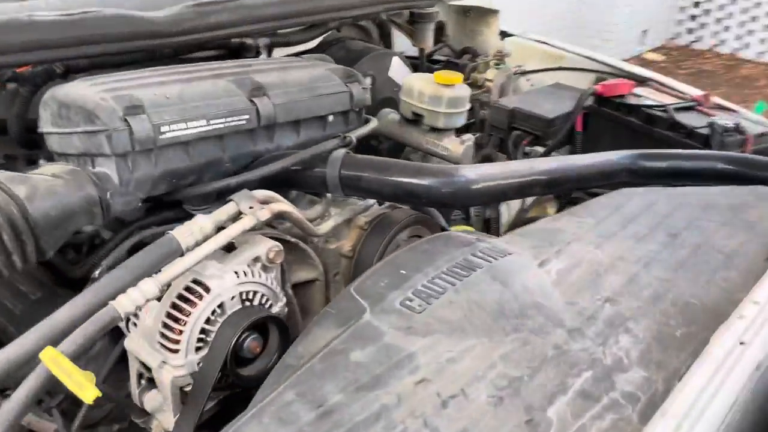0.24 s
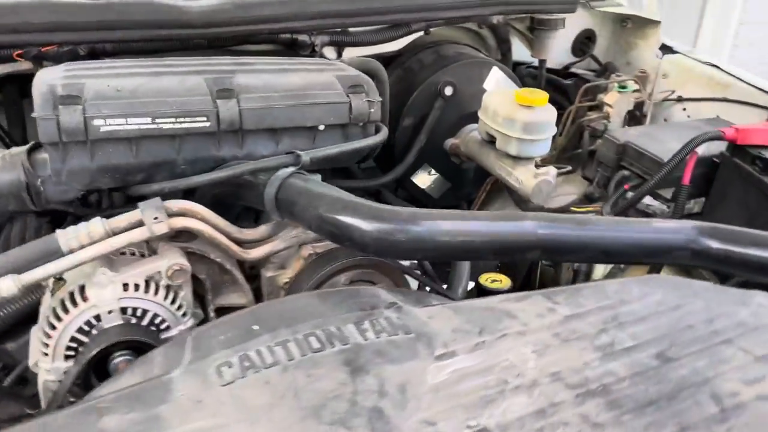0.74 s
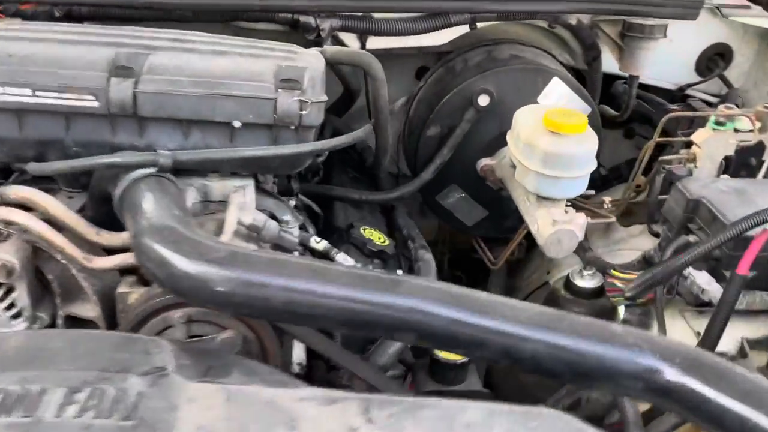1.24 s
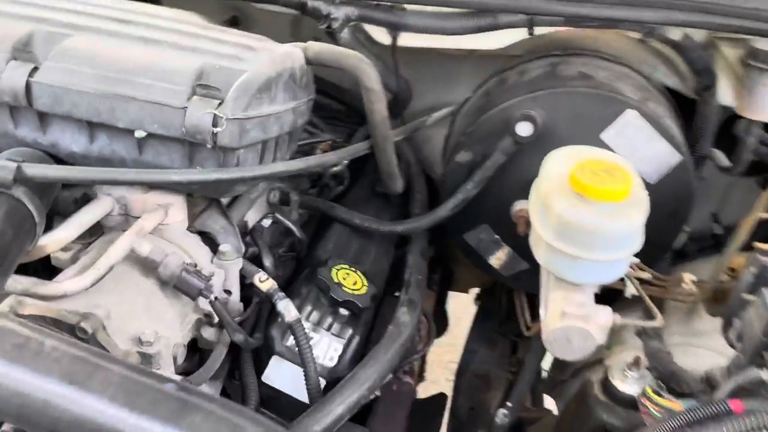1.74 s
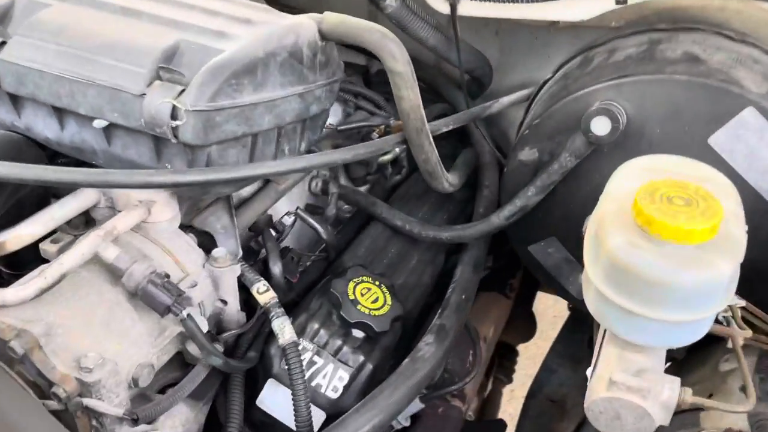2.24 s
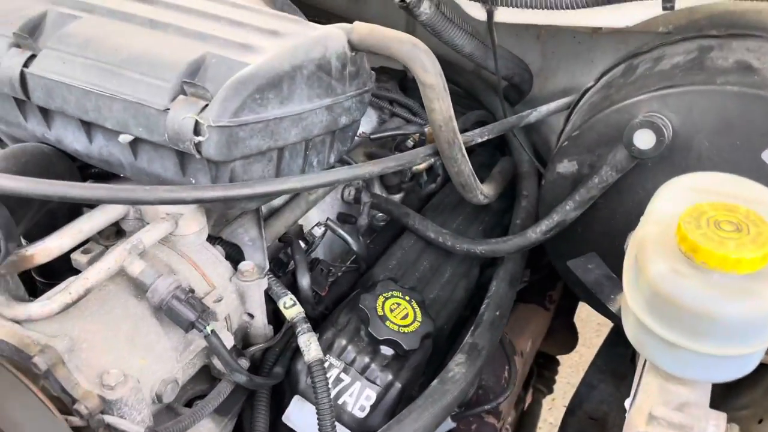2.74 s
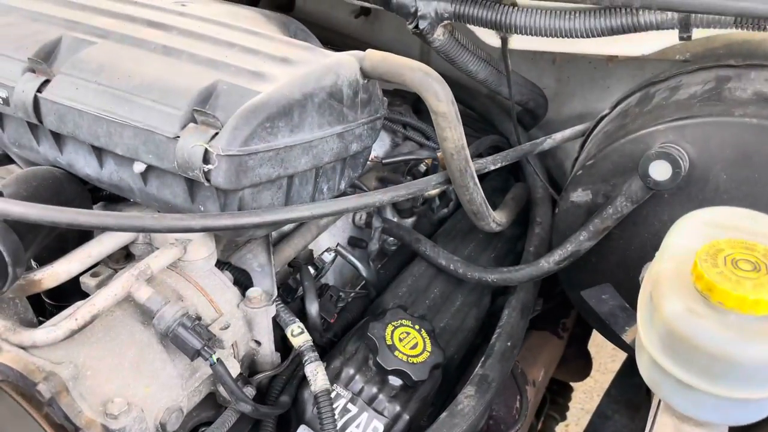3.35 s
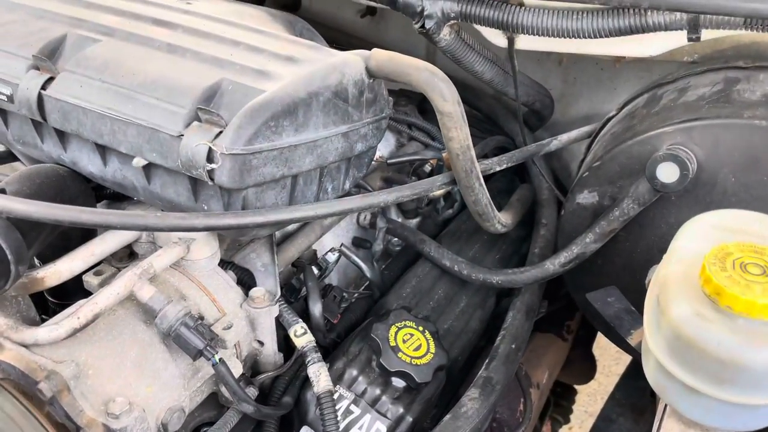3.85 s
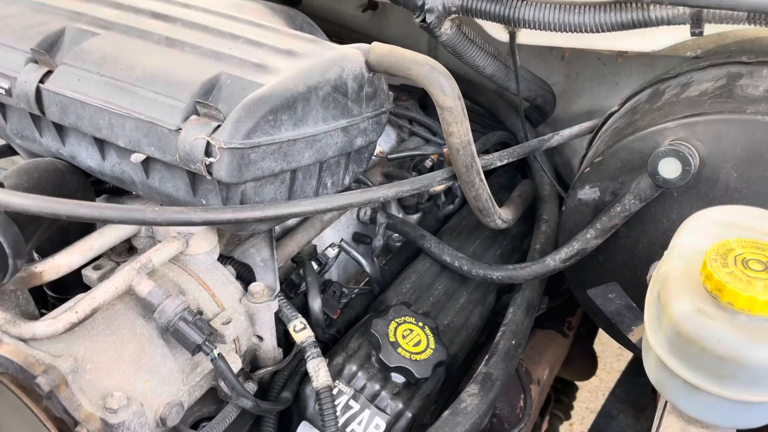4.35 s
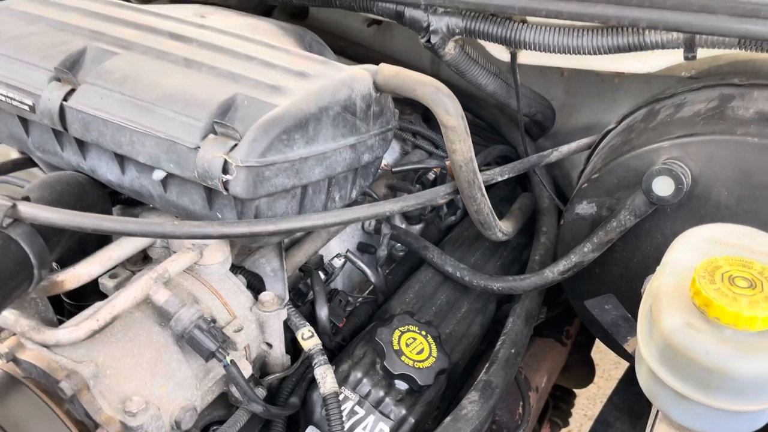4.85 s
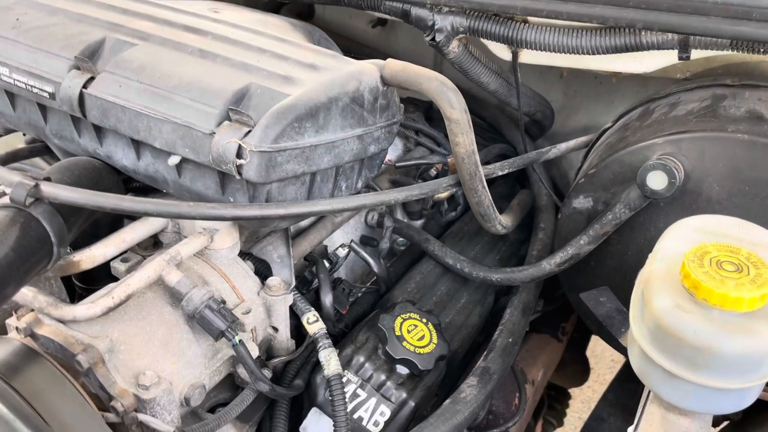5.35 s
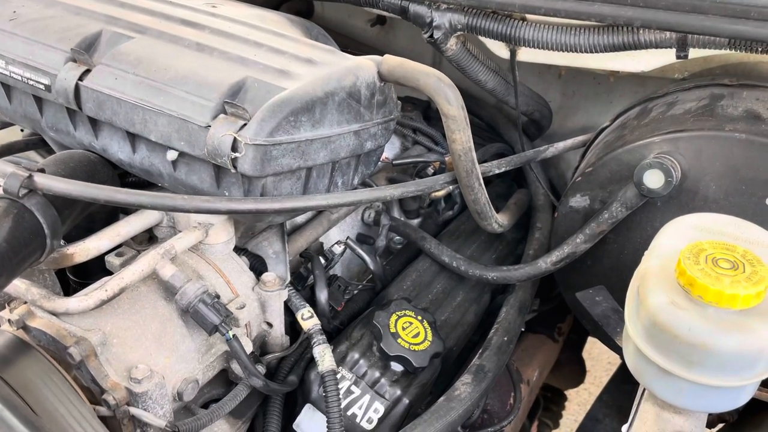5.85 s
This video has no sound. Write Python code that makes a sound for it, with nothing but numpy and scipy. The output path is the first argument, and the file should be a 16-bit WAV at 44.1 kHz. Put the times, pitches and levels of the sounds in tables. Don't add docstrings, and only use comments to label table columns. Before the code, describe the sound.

A big petrol engine drops from fast idle to a lumpy, missing idle while the listener moves from rushing fan to ticking valve gear.

```python
import sys
import numpy as np
from scipy import signal
from scipy.fft import rfft, irfft
from scipy.io import wavfile
from scipy.ndimage import uniform_filter1d

SR = 44100
rng = np.random.default_rng(int(sys.argv[2]) if len(sys.argv) > 2 else 0)


def voltage_ratio(level):
    return 10 ** (np.asarray(level, float) / 20)


def to_wav(sig):
    pcm = np.clip(np.atleast_2d(sig), -1, 1) * 32767
    pcm = np.round(pcm).astype(np.int16)
    wavfile.write(sys.argv[1], SR, pcm.T)


N = 268569
TIME = np.arange(N) / SR
COARSE = TIME[::32]
FREQ = np.fft.rfftfreq(N, 1 / SR)

# time [s], way from the fan to the bank [0-1], closeness to the metal [dB].
PHONE = [
    (0, 0, 5.5),
    (.4, 0.2, 1),
    (.7, 0.15, -1),
    (1.2, 0.43, -2),
    (1.7, 0.64, -1),
    (2.4, 0.92, -1),
    (3.1, 0.89, 0.5),
    (4.2, 0.97, 0),
    (5.0, 0.94, 2),
    (6.09, 0.94, 3),
]


def unit(x):
    return x / np.sqrt(np.mean(x ** 2))


def steady(x, span_s):
    return x / np.sqrt(uniform_filter1d(x ** 2, size=int(SR * span_s)) + 1e-9)


def curves(table):
    s, *columns = np.transpose(table)
    return [np.interp(TIME, s, c) for c in columns]


def across(table, column):
    log_hz = np.log([row[0] for row in table])
    return np.interp(np.log(FREQ + 1), log_hz, [row[column] for row in table])


def bell(s, half_s):
    return np.exp(-((COARSE - s) / half_s) ** 2)


def every_sample(coarse):
    return np.interp(TIME, COARSE, coarse)


def swells(floor_db, table):
    power = sum(voltage_ratio(db) ** 2 * bell(s, half_s) for s, half_s, db in table)
    return 10 * np.log10(voltage_ratio(floor_db) ** 2 + every_sample(power))


def walk(rate_hz):
    hold = int(SR / rate_hz)
    steps = np.repeat(rng.standard_normal(N // hold + 1), hold)
    return unit(uniform_filter1d(uniform_filter1d(steps, hold), hold)[:N])


def ring(x, modes):
    out = 0
    for hz, width_hz, db in modes:
        section = np.concatenate(signal.iirpeak(hz, hz / (1.13 * width_hz), SR))
        out = out + voltage_ratio(db) * unit(signal.sosfilt([section, section], x))
    return unit(out)


def air_noise(table, flicker_db):
    spectrum = rfft(rng.standard_normal(N)) * voltage_ratio(across(table, column=1))
    octave = np.log2(FREQ + 1)
    out = 0
    for k in range(6, 15):
        octave_slice = np.clip(1 - abs(octave - k), 0, 1)
        out = out + irfft(spectrum * octave_slice, N) * voltage_ratio(flicker_db * walk(9))
    return unit(out)


def firings(crank, column, scatter_db):
    # exhaust [dB], intake [dB], valve tick [dB].
    cylinders = [(0, -8, 0), (0, -4, 0), (-24, -6, -9), (0, 0, -2), (-24, -4, -12), (-24, -18, -6),
                 (0, -1, 0), (-24, -20, -6)]
    count = np.floor(crank).astype(int)
    habit_db = np.array(cylinders)[count % len(cylinders), column]
    return voltage_ratio(habit_db + scatter_db * rng.standard_normal(count[-1] + 2)[count + 1])


def pulses(crank, column, scatter_db):
    fired = np.diff(np.floor(crank), prepend=np.floor(crank[0]))
    return fired * firings(crank, column, scatter_db)


def clatter(crank, blows, scatter_db):
    place, db = np.transpose(blows)
    place = place + 8 * np.arange(crank[-1] // 8 + 1)[:, None]
    out = np.zeros(N + 1)
    out[np.searchsorted(crank, place)] = voltage_ratio(db + scatter_db * rng.standard_normal(place.shape))
    return out[:N]


def misses(column):
    # time [s], exhaust depth [dB], air box depth [dB]; negative = stronger.
    failed = [(0.049, 15, 11), (.11, 10, 8), (.17, 0, -1), (.235, 19, 5), (.40, 4, 0), (.46, 5, 13),
              (.56, 1, 17), (.61, 7, 23), (.71, -15, 2), (.755, 19, 19), (.89, 20, 2), (.935, 12, 24),
              (1.08, 8, 5), (1.2, 13, -4), (1.63, 6, 29), (1.71, 1, 24), (1.93, 7, -3), (2.02, -2, 5),
              (2.09, -1, -5), (2.18, 3, 6), (2.27, -3, 9), (2.35, 15, 14), (2.43, -5, 8), (2.56, -1, 12.5),
              (2.67, 1, -1), (2.77, -1, 8), (2.86, 10, 21), (3.05, -4, 8), (3.2, 10, 11), (3.29, -4, 19),
              (3.36, -4, 6), (3.56, 8, 16), (3.83, -1, 17), (4.09, 9, 3), (4.17, 2, 17), (4.28, 8, -0.5),
              (4.45, 5, -2), (4.49, 2, 6), (4.645, 19, 2), (4.91, 12, 5), (4.98, 1, 11), (5.24, 1, 9),
              (5.345, 2, 2), (5.39, -5, -1), (5.44, -2, 8), (5.51, 13, 14), (5.68, -11, 10), (5.92, -2, 2),
              (6.07, -8, -1)]
    return every_sample(voltage_ratio(-sum(row[column] * bell(row[0], half_s=.014) for row in failed)))


def boom(crank, speed, exhaust_db, box_db):
    # frequency [Hz], width [Hz], level [dB].
    exhaust_modes = [(44.5, 9.8, -4), (53.7, 12, -3), (62.3, 18.5, 6.5), (74.3, 13.7, 4), (91, 3.3, -5)]
    box_modes = [
        (103, 8, 0),
        (114, 9, -10),
    ]
    # time [s], half length [s], peak [dB].
    box_booms = [
        (0, 0.044, -26),
        (0.504, 0.016, -27),
        (0.825, 0.12, -30),
    ]
    # time [s], half length [s], level [dB].
    dip_s, dip_half_s, dip_db = (.85, .2, -4)
    rumble = (speed / speed[-1]) ** 2.56 * rng.standard_normal(N)
    pipes = ring(unit(pulses(crank, column=0, scatter_db=2.0)) + 0.07 * rumble, exhaust_modes)
    box = ring(unit(pulses(crank - .73, column=1, scatter_db=4.0)) + 0.3 * rumble, box_modes)
    exhaust_db = exhaust_db + dip_db * every_sample(bell(dip_s, dip_half_s))
    pipes = voltage_ratio(exhaust_db) * misses(column=1) * steady(pipes, span_s=.12)
    return pipes + voltage_ratio(swells(box_db, box_booms)) * misses(column=2) * steady(box, span_s=.045)


def drone(crank):
    # time [s], pitch [Hz].
    own_pitch = [(0.2, 110), (0.4, 114), (2.6, 102.6), (3.0, 104.2), (3.6, 104.8), (4.1, 103.3), (4.5, 102),
                 (5.2, 100.6)]
    # time [s], half length [s], peak [dB].
    own_swells = [
        (0.3, 0.074, -26.5),
        (2.9, 0.14, -23.5),
        (3.25, 0.083, -30),
        (3.625, 0.18, -21.5),
        (4.014, 0.17, -20.5),
        (4.33, 0.12, -25.5),
        (4.702, 0.2, -20),
        (5.0, 0.144, -28.5),
    ]
    second_swells = [
        (1.1, .16, -29),
        (1.39, .17, -23),
        (1.62, .15, -30),
        (2.6, .7, -34),
    ]
    silent_db = -70
    own = np.sin(2 * np.pi * np.cumsum(curves(own_pitch)[0]) / SR)
    second = np.cos(4 * np.pi * (crank - .04))
    notes = voltage_ratio(swells(silent_db, own_swells)) * own + voltage_ratio(swells(silent_db, second_swells)) * second
    return np.sqrt(2) * misses(column=2) * notes


def runners(crank, near, level_db):
    # pitch [Hz], drift [Hz], level [dB].
    pipe_notes = [
        (260.4, 4, 1),
        (312, 8.02, -4),
        (421.8, 14, -8),
        (562.3, 6.98, -9),
    ]
    # place in cycle [firings], level [dB].
    pipe_puffs = [
        [(.7, -4), (1.2, -6), (1.8, 0), (2.4, -6), (2.85, -3.5), (3.5, -18), (4.8, -12), (5.7, -4), (6.3, -8),
         (6.7, -5), (7.35, -14)],
        [(.3, -7), (1.5, -14), (2.6, -4.5), (3.25, 0), (4.3, -14), (6.3, -9), (7.2, -14)],
        [(.25, -2), (.85, -7), (1.5, 0), (2.25, -13), (3.2, .5), (3.8, -13), (4.75, -4), (5.75, -9), (6.25, -1),
         (7.25, -9)],
        [(.3, -6), (1.6, -.7), (2.55, -11), (3.5, 0), (4.7, -11), (6, 0), (6.8, -3)],
    ]
    out = 0
    for (hz, drift_hz, db), puffs in zip(pipe_notes, pipe_puffs):
        note = np.sin(2 * np.pi * np.cumsum(hz + drift_hz * walk(30)) / SR)
        place, puff_db = np.transpose(puffs)
        out = out + note * voltage_ratio(db + np.interp(crank, place, puff_db, period=8) + .9 * walk(25))
    return voltage_ratio(level_db + 2.0) * near * out


def cycle_knocks(crank):
    # place in cycle [firings], level [dB].
    knock_places = [
        (.24, -9.5),
        (.31, -7),
        (.97, -3),
        (2.74, -1),
        (2.81, -5.5),
        (3.02, -8.5),
        (4.8, -3),
        (5.44, -7.5),
        (7.73, -4.5),
    ]
    return unit(clatter(crank, knock_places, scatter_db=1.5))


def block(crank, knocks, near, level_db):
    # frequency [Hz], width [Hz], level [dB].
    casting_modes = [(175, 38, -4.5), (291, 54, -7), (440, 66, -2), (559.3, 42, -6), (708.5, 26, -7),
                     (922, 33, -11.5)]
    shroud_modes = [(242, 19, -6), (334.3, 27.4, 6), (620, 200, 2), (915, 210, -17), (1410, 530, 1),
                    (3465, 80, -13)]
    hush = voltage_ratio(-4 * near * np.exp(-((crank % 8 - 4.2) / .7) ** 2))
    castings = hush * steady(ring(knocks + .2 * rng.standard_normal(N), casting_modes), span_s=.3)
    shroud = steady(ring(rng.standard_normal(N), shroud_modes), span_s=.1)
    return voltage_ratio(level_db - 4.5) * (np.sqrt(0.072 + 0.12 * near) * castings + np.sqrt(1 - near) * shroud)


def valve_ticks(crank, near):
    phase = crank % 1
    burst = np.exp(-((phase - .25) / np.where(phase < .25, .08, .17)) ** 2)
    return firings(crank, column=2, scatter_db=3.0) * burst * (0.4 + 0.56 * near)


def valve_gear(ticks, near, level_db):
    # frequency [Hz], density [dB per Hz].
    hiss_colour = [(3000, -10), (5500, -6), (7200, -1), (9800, 0), (11500, -1.5), (12700, -6), (14000, 0),
                   (16000, -9.5)]
    # frequency [Hz], width [Hz], level [dB].
    injector_modes = [
        (10370, 1700, 1),
        (11880, 320, -3),
        (12640, 570, -0.5),
    ]
    hiss = air_noise(hiss_colour, flicker_db=2.25)
    injectors = ring(rng.standard_normal(N), injector_modes)
    hiss = hiss + 0.82 * near ** 2 * voltage_ratio(walk(3.06)) * injectors
    high = signal.butter(2, 6500, "high", fs=SR, output="sos")
    return voltage_ratio(level_db + 6.0) * unit(hiss + 0.92 * signal.sosfilt(high, ticks * hiss))


def tappet_rattle(crank, near):
    # place in cycle [firings], level [dB].
    cycle_blows = [(.4, -4), (1.2, 3), (1.65, 3), (2.55, 0.5), (2.9, 0), (3.7, 8), (4.4, -4), (4.7, -0.5),
                   (5.25, -9), (5.7, 5), (6.15, -2), (6.55, -10), (6.9, -5), (7.6, -12)]
    # time [s], peak [dB].
    loud_blows = [(1.6041, -31), (1.654, -37), (1.7138, -31), (1.7727, -25.5), (2.081, -30), (2.143, -28),
                  (2.2087, -32), (2.296, -37), (2.4896, -30), (2.661, -24), (2.8288, -26), (2.9565, -34),
                  (3.0039, -32), (3.0323, -33), (3.1995, -33), (3.3107, -24), (3.3411, -34), (3.4045, -35),
                  (3.5656, -29), (3.5926, -29), (3.643, -31), (3.7552, -36), (3.9243, -23), (4.0041, -33),
                  (4.085, -27), (4.3454, -42), (4.4935, -29), (4.6058, -32), (4.6547, -30), (4.739, -34),
                  (4.9235, -28), (5.0253, -31), (5.0458, -33), (5.067, -31), (5.1056, -32), (5.1575, -35),
                  (5.2009, -35), (5.241, -35), (5.6933, -26), (5.7153, -37), (5.8006, -28), (5.8839, -35),
                  (5.916, -34), (5.9392, -41), (5.983, -31)]
    blows = 0.51 * near * clatter(crank, cycle_blows, scatter_db=0.0)
    s, peak_db = np.transpose(loud_blows)
    blows[(s * SR).astype(int)] += voltage_ratio(peak_db + 29)
    chance = rng.random((2, N))
    blows += .5 * (.3 + 0.65 * near) * (chance[0] < 170 / SR) * (.3 + 1.3 * chance[1] ** 2)
    return near * .08 + signal.lfilter([1], [1, -np.exp(-1 / (.004 * SR))], blows)


def fan(rattle, level_db):
    # frequency [Hz], density [dB per Hz].
    rush_colour = [(76, -2.5), (130, -8), (167, -15.5), (266, -9.5), (360, -13.5), (564, -15), (774, -18.5),
                   (1060, -15.5), (1280, -22.5), (1720, -23), (7000, -37), (9100, -53), (15400, -120)]
    # frequency [Hz], width [Hz], level [dB].
    tappet_modes = [(1760, 154, 3.5), (2088, 360, 4), (2450, 520, -4), (3240, 950, -2), (4340, 260, -6.5),
                    (5730, 1800, -3)]
    tappets = ring(rattle * rng.standard_normal(N), tappet_modes)
    rush = air_noise(rush_colour, flicker_db=0.78)
    return voltage_ratio(level_db + 6.0) * rush + voltage_ratio(level_db - 9.0) * tappets


def alternator(crank, level_db):
    # time [s], half length [s], peak [dB].
    glimpses = [(.67, 0.066, -42.5), (1.0, 0.1, -46), (1.367, 0.087, -41.5), (1.986, 0.16, -43),
                (2.604, 0.17, -48), (3.296, 0.051, -42), (3.62, .1, -45), (4.03, 0.039, -37),
                (4.395, 0.042, -36.5), (4.7, 0.064, -39), (4.897, 0.058, -48), (5.218, 0.042, -37),
                (5.634, 0.07, -42), (6.003, 0.06, -40)]
    # time [s], half length [s], pitch
    # shift [Hz].
    sags = [
        (3.27, .05, 12),
        (4.66, .05, 8),
        (4.78, .04, -34),
        (4.94, .07, 14),
        (5.55, .04, -14),
    ]
    sag_hz = every_sample(sum(hz * bell(s, half_s) for s, half_s, hz in sags))
    turns = 185 / 8 * crank + np.cumsum(sag_hz) / SR
    level_db = swells(level_db, glimpses) + 2.1 * walk(24)
    return voltage_ratio(level_db) * np.sqrt(2) * np.sin(2 * np.pi * turns + walk(33))


def panels():
    # frequency [Hz], width [Hz], time [s], half length [s], peak [dB].
    panel_modes = [(2035, 34, 0.65, 0.081, -48), (4310, 96, 1.75, 0.44, -55), (5430, 300, 1.85, .3, -52),
                   (707, 37, 3.03, 0.24, -40), (189, 38, 3.82, 0.52, -40.5), (6200, 2000, 2.6, 0.52, -45.5),
                   (932, 35, 5.6, 0.39, -42), (270, 39, 1.54, 0.27, -34.5), (193, 45, 0.99, 0.14, -40.5),
                   (339, 16, 0.23, 0.081, -41), (608, 44, 0.14, 0.18, -39), (1450, 38, 0.19, 0.12, -51.5),
                   (3250, 400, 0.13, .06, -43), (1800, 700, 0.091, 0.2, -44), (571, 20, 2.32, 0.18, -38.5),
                   (571, 24, 5.98, 0.14, -37.5)]
    noise = rng.standard_normal(N)
    out = 0
    for hz, width_hz, s, half_s, db in panel_modes:
        out = out + every_sample(voltage_ratio(db) * bell(s, half_s)) * ring(noise, [(hz, width_hz, 0)])
    return out


def finger():
    # time [s], peak [dB].
    taps = [
        (0.885, -17.5),
        (.902, -40),
    ]
    out = np.zeros(N)
    for s, db in taps:
        age = np.clip(TIME - s, 0, 1) / 0.0036
        out += voltage_ratio(db) * age * np.exp(1 - age)
    return out * ring(rng.standard_normal(N), [(760, 200, 1), (1030, 360, 3), (1440, 270, -6)])


def ports(tones, shared, diffuse):
    # frequency [Hz], likeness [0-1], phase by which left leads [rad], left minus right [dB].
    port_table = [(100, 0.82, 0.19, -3.5), (254, 0.84, 0.41, -2.5), (440, 0.98, 0.38, -1.5),
                  (648, 0.65, 1.58, 0), (1330, 0.19, 0.6, 2), (3960, 1, 1.4, 1.8), (5200, 0.68, 0.5, 3.5),
                  (5380, 0.5, -1.8, 0), (6970, 0.9, -1, 1.5), (6560, 0.28, -2, 3), (8570, 0.85, -2.5, -0.5),
                  (13500, 0.53, -6.5, 0)]
    like = np.clip(across(port_table, column=1), 0, 1)
    lag = np.exp(-1j * across(port_table, column=2))
    balance = voltage_ratio(across(port_table, column=3) / 2)
    right = (tones + like * shared + np.sqrt(1 - like ** 2) * diffuse) * lag
    return np.array([irfft((tones + shared) * balance, N), irfft(right / balance, N)])


def scene():
    # time [s], firing rate [firings/s].
    firing_rate = [(0.25, 78.23), (0.6, 71.0), (0.72, 66.0), (1.0, 59.7), (1.25, 55.86), (1.5, 52.71),
                   (2.0, 48.12), (2.25, 46.34), (2.75, 46.67), (3.0, 46.22), (3.5, 44.64), (3.75, 44.46),
                   (4.0, 44.73), (4.25, 44.63), (4.75, 45.35), (5.0, 45.46), (5.5, 44.9), (6.09, 44.66)]
    # level at the fan [dB], gain at the bank [dB], share of the closeness [ratio].
    heard = dict(exhaust=(-30, 2.3, 0.29), box=(-32, 2.5, 0.16), block=(-31.5, 3.8, 0.73),
             fan=(-37, 0.33, 1), hiss=(-48, 4.48, 0.99), whine=(-61.5, 16.6, 1.6))
    speed = curves(firing_rate)[0]
    crank = np.cumsum(speed) / SR + 0.064
    near, close_db = curves(PHONE)
    near = np.clip(near, 0, 1)
    db = {}
    for name, (fan_db, bank_db, share) in heard.items():
        db[name] = fan_db + bank_db * near + share * close_db

    tones = boom(crank, speed, db["exhaust"], db["box"]) + drone(crank)
    tones = tones + runners(crank, near, db["block"]) + alternator(crank, db["whine"]) + panels()

    knocks = cycle_knocks(crank)
    ticks = valve_ticks(crank, near)
    rattle = tappet_rattle(crank, near)
    fields = []
    for _ in range(2):
        field = block(crank, knocks, near, db["block"]) + valve_gear(ticks, near, db["hiss"])
        fields.append(rfft(field + fan(rattle, db["fan"])))
    return ports(rfft(tones), *fields) + finger() * np.array([[1], [-.6]])


def empty_bands(x):
    # channel [0 mid, 1 side], from [Hz], to [Hz], scatter [Hz],
    # shift of both edges at the bank [Hz], always empty [Hz].
    gaps = [
        (0, 8000, 9850, 260, (100, -350), 8300),
        (0, 16200, 22000, 550, (0, 0), 20000),
        (1, 12750, 22000, 300, (450, 0), 20000),
    ]
    band_hz, offset = 32 * SR / 2048, 296
    x = np.roll(x, -offset, axis=1)
    mid_side = np.array([x[0] + x[1], x[0] - x[1]]) / 2
    hz, s, frames = signal.stft(mid_side, SR, nperseg=2048, noverlap=1024)
    near = np.interp(s, TIME, curves(PHONE)[0])
    for channel, low_hz, high_hz, scatter_hz, shift_hz, empty_hz in gaps:
        chance = uniform_filter1d(rng.standard_normal((2, len(s))), size=2) * np.sqrt(2)
        edges = np.array([[low_hz], [high_hz]]) + np.outer(shift_hz, near) + scatter_hz * chance
        edges = np.array([np.minimum(edges[0], empty_hz), np.maximum(edges[1], empty_hz + band_hz)])
        low, high = edges // band_hz * band_hz
        frames[channel] *= (hz[:, None] < low) | (hz[:, None] > high)
    mid, side = signal.istft(frames, SR, nperseg=2048, noverlap=1024)[1][:, :N]
    return np.roll([mid + side, mid - side], offset, axis=1)


def roll_off(x):
    return signal.sosfilt(signal.butter(12, 15780, fs=SR, output="sos"), x)


def record(dry):
    cut = signal.sosfilt(signal.butter(3, 44, "high", fs=SR, output="sos"), dry)
    mix = empty_bands(cut)
    return roll_off(mix)


dry = scene()
out = record(dry)
to_wav(out)
```